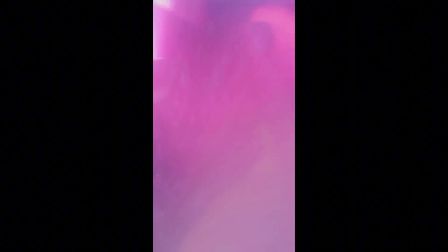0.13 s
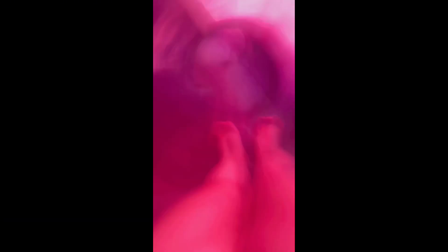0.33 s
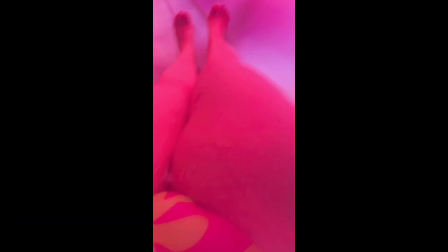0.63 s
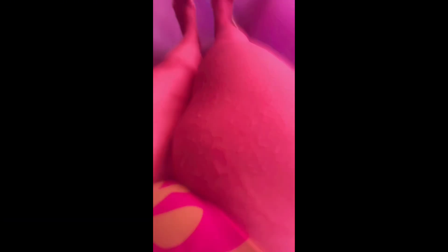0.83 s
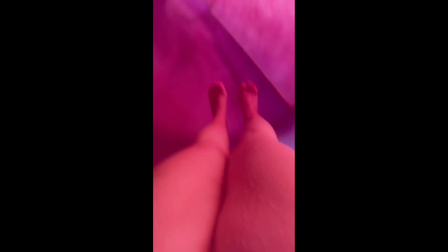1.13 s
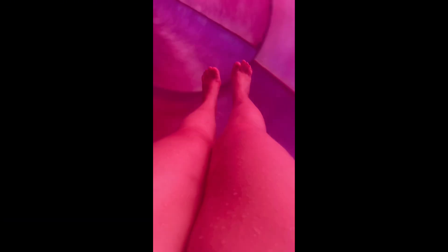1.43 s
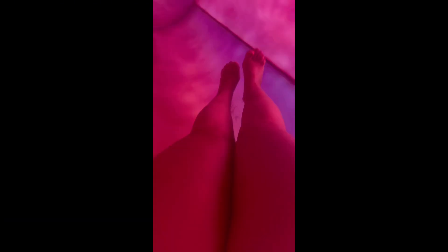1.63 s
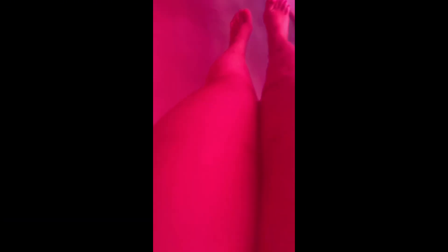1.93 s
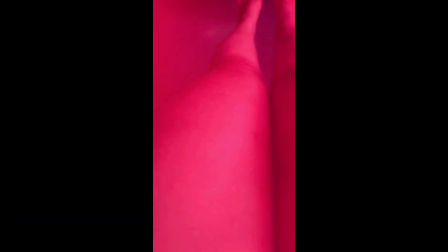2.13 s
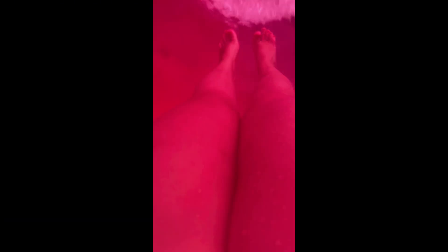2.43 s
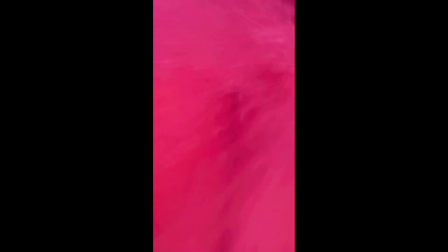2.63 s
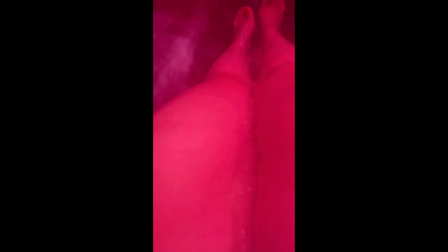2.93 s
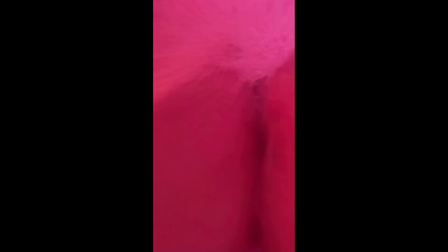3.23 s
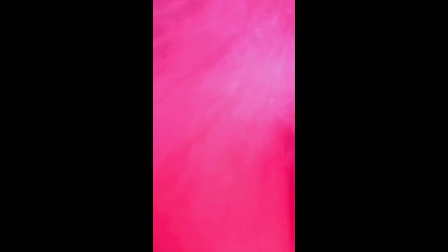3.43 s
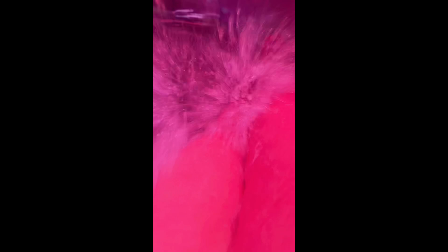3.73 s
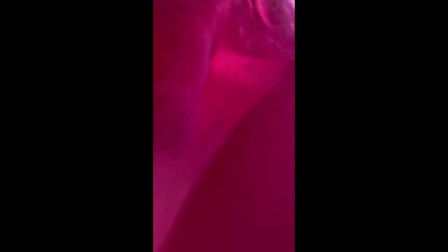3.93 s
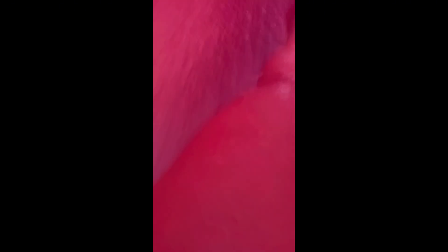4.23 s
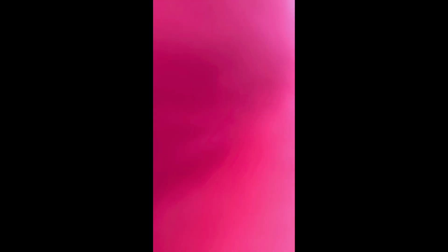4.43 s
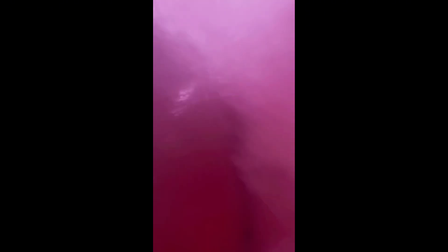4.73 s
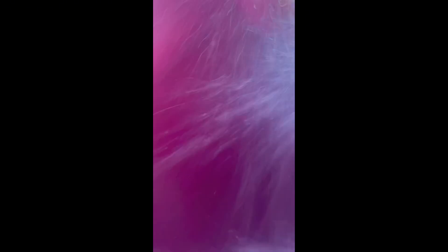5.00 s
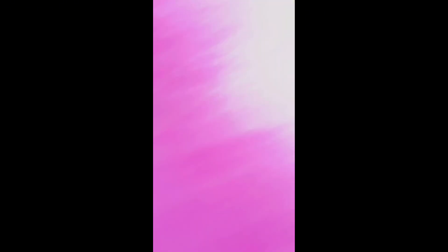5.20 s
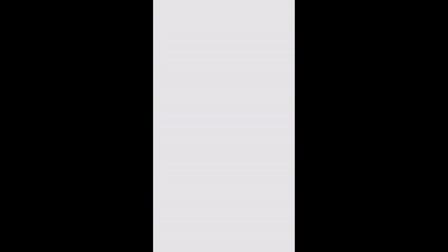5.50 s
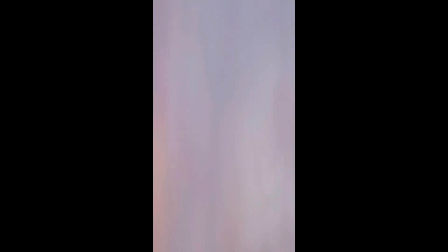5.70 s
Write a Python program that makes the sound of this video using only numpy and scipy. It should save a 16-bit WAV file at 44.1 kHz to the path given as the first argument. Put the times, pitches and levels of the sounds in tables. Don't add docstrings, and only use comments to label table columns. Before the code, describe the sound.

A ride down an enclosed water slide lasting about six seconds, heard from a small housing close to the water. From 0 to 0.3 s there is a light spray with ticking drops and soft knocks. Until 2.5 s thin water rushes steadily, with faint hollow hums swelling in the tube, scattered drop clicks and dull seam knocks near 0.9, 1.2 and 1.9 s. At 2.6 s a hard knock and short splash break in, followed by smaller bumps. From 3.2 to 3.9 s heavy water pounds the housing, with dense thumps falling in pitch, strongest around 3.3 and 3.8 s. After a brief lull, sharp slaps and hissing spray return at 4.4 to 4.8 s. More washes follow at 5.1, 5.2 and 5.4 to 5.5 s, then a dip, and a last bright, heavy splash with a thud hits at 5.8 s.

```python
import sys
import numpy as np
from scipy import signal
from scipy.fft import rfft, irfft, next_fast_len
from scipy.io import wavfile
from scipy.ndimage import uniform_filter1d, map_coordinates

SR = 44100
rng = np.random.default_rng(int(sys.argv[2]) if len(sys.argv) > 2 else 0)


def field_ratio(decibels):
    return 10 ** (np.asarray(decibels, dtype=float) / 20)


def waveform_to_disk(signal):
    frames = np.transpose(np.atleast_2d(signal))
    scaled = np.clip(frames, -1, 1) * 32767
    samples = np.round(scaled).astype(np.int16)
    wavfile.write(sys.argv[1], SR, samples)


N = 258405


def unit(x):
    return x / np.sqrt(np.mean(x ** 2) + 1e-20)


def along(points, hz):
    f, v = np.transpose(points)
    return np.interp(np.log(hz + 1), np.log(f + 1), v)


def curves(rows):
    s, *columns = np.transpose(rows)
    return [np.interp(np.arange(N) / SR, s, column) for column in columns]


def wobble(rate):
    knots = rng.standard_normal(int(N * rate / SR) + 4)
    return map_coordinates(knots, [np.arange(N) * rate / SR])


def filtered(x, response):
    m = next_fast_len(N + SR // 2)
    hz = np.fft.rfftfreq(m, 1 / SR)
    return irfft(rfft(x, m) * response(hz), m)[..., :N]


def coloured(x, spectrum):
    closed = [(1, -120)] + list(spectrum) + [(SR / 2, -120)]
    return unit(filtered(x, lambda hz: field_ratio(along(closed, hz))))


def noise(patchy_db):
    z = signal.stft(rng.standard_normal((2, N)), nperseg=512)[2]
    field = rng.standard_normal(z.shape[1:])
    for axis in (0, 1):
        field = uniform_filter1d(field, size=6, axis=axis)
    return signal.istft(z * field_ratio(patchy_db * unit(field)), nperseg=512)[1][:, :N]


def falling(t, hz, cycles, start, fall):
    turns = hz * t
    phase = start * turns / (1 + turns / fall) + 0.666 * np.sqrt(turns)
    swell = (turns / cycles * np.exp(1 - turns / cycles)) ** 0.93
    return np.sin(2 * np.pi * phase) * swell


# frequency_hz, density_db
RUMBLE = [(20, -37), (45, -3.5), (86, -4), (120, -9), (220, -24)]
# start_s, water_db, wall_rumble_db, mist_db
RUSH = [(0.0, -53, -48, -8.5), (0.2, -39, -37.5, -5), (0.45, -41, -47, -13), (0.85, -39, -48, -2.5),
        (1.1, -39.5, -38, -4.5), (1.5, -40.5, -47.5, -16.5), (1.78, -40.5, -46, -13),
        (2.2, -40.5, -41.5, -16), (2.5, -39, -41, -15), (2.7, -41, -33, -5), (3.15, -36.5, -38.5, -11.5),
        (3.5, -30.5, -41, -6), (4.15, -38.5, -45, -14), (4.3, -38, -40, -19.5), (4.6, -24.5, -27.5, -11),
        (4.95, -38.5, -42.5, -15), (5.45, -27, -23.5, -12), (5.86, -41, -49, -11.5)]
# frequency_hz, density_db
WATER = [(90, -6), (200, -1), (700, 0), (1300, -4.5), (2600, -2), (3700, -5.5), (5800, -11), (10000, -21),
         (12500, -28), (15800, -27)]


def rush():
    water_db, rumble_db, _ = curves(RUSH)
    flutter_db = 0.8 * wobble(10) + 0.5 * wobble(150)
    water = field_ratio(water_db + flutter_db) * coloured(noise(patchy_db=1.0), WATER)
    rumble = field_ratio(rumble_db + 1.5 * wobble(9)) * coloured(noise(patchy_db=2.0), RUMBLE)
    return water + rumble


# frequency_hz, width_hz, level_db
TUBE = [(225.6, 4.7, -7.5), (492.7, 4.9, 6), (744, 19, -22)]
# peak_s, level_db
HUM = [(.355, -45), (.49, -46), (.62, -47), (.855, -41), (.93, -48), (1.075, -42), (1.37, -46), (1.46, -48),
       (1.82, -50), (2.19, -49), (2.5, -49), (2.75, -47), (2.9, -48), (3.13, -43)]


def hum():
    swell_s = 0.045
    t = np.arange(N) / SR
    swells = sum(field_ratio(db) * np.exp(-((t - s) / swell_s) ** 4) for s, db in HUM)
    modes = lambda f: sum(field_ratio(db) * 1j * f * w / (c * c - f * f + 1j * f * w) for c, w, db in TUBE)
    ring = filtered(rng.standard_normal(N), modes)
    steady = ring / np.sqrt(uniform_filter1d(ring ** 2, size=1500) + 0.091 * ring.var())
    return swells * unit(steady) * [[1], [.3]]


# start_s, length_s, spray_db, weight_db
SPITS = [(0.0, 0.28, -34.5, -46.5), (0.197, 0.028, -28.5, -33.5), (0.752, 0.02, -34.5, -71),
         (0.87, 0.047, -39.5, -56), (0.926, 0.044, -41.5, -35), (1.017, 0.029, -34.5, -64),
         (1.168, .04, -34, -46), (1.332, 0.055, -36.5, -63), (1.513, 0.04, -35.5, -50),
         (1.762, 0.058, -42, -43.5), (2.496, 0.038, -35.5, -38.5), (4.892, 0.18, -33, -84),
         (5.516, 0.041, -15.5, -20.5)]
# start_s, length_s, spray_db, weight_db, build_up_db
WAVES = [(2.536, 0.064, -29, -33, 14), (2.598, 0.036, -37, -19, -6), (2.639, .11, -50, -28.5, -1),
         (2.783, 0.11, -52.5, -34.5, -1), (3.182, 0.062, -33.5, -25.5, 17), (3.249, 0.074, -30.5, -9, 9.5),
         (3.329, 0.06, -40, -19.5, -6.5), (3.41, .085, -41, -14, -2.5), (3.514, .09, -30.5, -12.5, 9.5),
         (3.605, 0.054, -33.5, -19.5, -4), (3.75, 0.049, -21, -8.5, 3.5), (3.837, .1, -49, -29.5, -6),
         (3.954, 0.1, -28.5, -31.5, 7), (4.061, 0.042, -36.5, -43, -6), (4.209, 0.2, -31.5, -55, 0.5),
         (4.381, 0.15, -21, -18, -3.5), (4.55, 0.14, -18, -17.5, 0), (4.749, 0.062, -18, -14, 1.5),
         (4.823, 0.048, -29, -28, -3.5), (5.06, 0.08, -25, -26, 0), (5.199, 0.12, -21, -18.5, 1),
         (5.393, 0.16, -23, -19.5, 4.5), (5.579, .19, -35, -35, -11), (5.795, 0.066, -12.5, -14.5, 17)]


def waves(column, rise_s, t60, drip_db):
    drip_t60 = 1
    t = np.arange(0, N / SR, 1e-3)
    power = np.full(len(t), 1e-7)
    for row in [(*spit, 0) for spit in SPITS] + list(WAVES):
        start, length, build_db = row[0], row[1], row[4]
        after = np.maximum(t - start - length, 0)
        rise = np.clip((t - start) / rise_s + .5, 0, 1) ** 2
        build = field_ratio(build_db * np.clip((t - start) / length - 1, -1, 0))
        drain = field_ratio(-60 * after / t60) + field_ratio(drip_db - 60 * after / drip_t60)
        power += (field_ratio(row[column]) * rise * build * drain) ** 2
    return np.interp(np.arange(N) / SR, t, 10 * np.log10(power))


def spray_level():
    return waves(column=2, rise_s=0.009, t60=0.066, drip_db=-18)


def weight_level():
    return waves(column=3, rise_s=0.024, t60=0.082, drip_db=-27)


# frequency_hz, density_db
SPRAY = [(700, -6.5), (1700, 1.5), (2800, 2), (4300, -4), (5300, -2), (7000, -11.5), (12000, -38.5)]
SLOSH = [(250, -5), (550, -1.5), (1000, -4.5), (1600, -14.5), (3000, -18.5)]
MIST = [(2200, -17), (4000, -1.5), (5500, 1.5), (7500, -16.5)]
FIZZ = [(4000, -44), (7000, -5), (10000, 3), (13000, -5), (15900, -0.5)]
# frequency_hz, gain_db
CLICK = [(200, -6), (900, 2), (5000, -2.5), (9000, -20.5), (16000, -39)]
# start_s, click_db, splash_db
SPLATS = [(0.0333, -18, -22), (0.0494, -25.5, 8), (0.1194, -28, 11), (0.2096, -12, -5), (0.744, -19, -4.5),
          (0.8723, -15.5, -17), (1.0187, -15, -10), (1.1843, -26, -2), (1.331, -22.5, -4),
          (1.515, -17, -18), (1.5319, -18, -11), (1.779, -21, -4), (2.5092, -24.5, 2), (2.607, -19, 1.5),
          (2.7434, -27, -25), (2.858, -33, -18), (3.269, -11, -9.5), (3.3253, -14, -1), (3.4177, -13, -6.5),
          (3.458, -3.5, -12.5), (3.5862, -8.5, -6.5), (3.7683, -9, -1.5), (4.0407, -11.5, -6),
          (4.3907, 0, -6.5), (4.5356, -12, 0.5), (4.5605, -12, -8), (4.5973, -5, -3), (4.7407, -2, -10.5),
          (5.3918, -10, -5), (5.797, -22, -9)]


def wash():
    splash_t60, click_t60 = 0.024, 0.005
    spray_db = spray_level()
    fizz_db = curves(RUSH)[2] - 0.16 * (np.clip(spray_db, -50, 0) + 35.5)
    slosh_db = -1 + 0.96 * np.clip(weight_level() - spray_db, -25, 15)
    clumps_db = 0.37 * wobble(30) + 1.67 * wobble(220) + 3.66 * wobble(900)
    crowd = field_ratio(spray_db - 4.0) * unit(field_ratio(clumps_db))

    t = np.arange(SR // 5) / SR
    single, clicks = np.zeros((2, N + SR))
    for s, db, splash_db in SPLATS:
        first = round(s * SR)
        single[first:][:len(t)] += field_ratio(db + splash_db - 9 - 60 * t / splash_t60)
        clicks[first:][:len(t)] += field_ratio(db + 1.5 - 60 * t / click_t60)

    drops = noise(patchy_db=2.5)
    colour = coloured(drops, SPRAY)
    colour += field_ratio(slosh_db) * coloured(drops, SLOSH)
    colour += field_ratio(fizz_db + 5) * coloured(drops, FIZZ)
    colour += field_ratio(fizz_db + 2.5) * coloured(drops, MIST)
    snap = np.sign(drops)
    snaps = filtered(clicks[:N] * snap, lambda hz: field_ratio(along(CLICK, hz)))
    return np.hypot(crowd, single[:N]) * colour + snaps


# frequency_hz, density_db
POUND = [(60, 7.5), (140, -3), (350, 1), (550, 1.5), (1200, -19.5)]


def buffet(count=700):
    pound_db = weight_level()
    heave_db = pound_db - 4.5 + 0.22 * np.clip(pound_db - spray_level(), -10, 15)
    heave_s = 0.051
    swing = uniform_filter1d(field_ratio(heave_db), size=round(heave_s * SR))

    t = np.arange(SR // 20) / SR
    start, pitch, size = rng.random((2, count, 3)).T[..., None]
    grains = field_ratio(-9 * size) * falling(t, 150 + 300 * pitch, cycles=0.86, start=1.22, fall=4.68)
    where = (start * N).astype(int) + np.arange(len(t))
    pound = np.array([np.bincount(where[:, c].ravel(), grains[:, c].ravel(), N + SR)[:N] for c in range(2)])
    pound = coloured(unit(pound) + 1.66 * unit(noise(patchy_db=-1.5)), POUND)
    heave = swing * field_ratio(1.3 * wobble(18)) * coloured(noise(patchy_db=-5.0), RUMBLE)
    return field_ratio(pound_db - 3.5) * pound + heave


# start_s, peak_db, pitch_hz,
# cycles_to_peak
BLOWS = [(0.048, -33, 150, 0.69), (1.194, -22, 260, 0.93), (0.125, -23.5, 125, 1.1),
         (0.205, -15, 140, 0.77), (0.921, -18.5, 218, 1.15), (0.934, -11, 61, 0.6), (0.967, -17, 270, 1.2),
         (1.281, -20.5, 330, 0.92), (1.896, -26, 204, 1.5), (1.972, -29, 234, 1.3),
         (2.605, 1.5, 355, 1.53), (2.619, -12.5, 227, 2.1), (2.693, -13.5, 126, 2.3),
         (2.815, -22.5, 205, 1.9), (2.857, -13.5, 341, 1.38), (2.919, -19, 190, 1.4),
         (2.975, -24, 300, 0.87),
         (3.262, -11.5, 189, 2.5), (3.3, 1, 216, 3.5), (3.345, -4.5, 199, 4), (3.433, -16, 123, 1.7),
         (3.468, -4, 219, 0.81), (3.586, -4.5, 110, 1.6), (3.626, -2.5, 304, 0.75),
         (3.693, -10.5, 246, 0.94), (3.771, -0.5, 346, 3.2), (3.794, 1.5, 306, 1.9), (3.818, 0.5, 297, 1.1),
         (3.859, -12, 110, 0.51), (4.005, -14.5, 206, 1.6), (4.388, -2, 330, 2.8), (4.557, -11, 147, 1.2),
         (4.633, -4, 462, 1.2), (4.692, -4.5, 372, 0.92), (4.761, -17, 328, 1.2), (5.085, -14.5, 114, 1.3),
         (5.395, -11.5, 120, 1.3), (5.696, -16.5, 220, 1.2), (5.456, -11.5, 169, 0.86),
         (5.494, -12, 290, 1.9), (5.828, -8.5, 255, 1.26)]


def thumps():
    out = np.zeros(N + SR)
    t = np.arange(SR // 4) / SR
    for s, db, hz, cycles in BLOWS:
        out[round(s * SR):][:len(t)] += field_ratio(db - 6.0) * falling(t, hz, cycles, start=1.353, fall=7.14)
    ragged_db = 2 * wobble(160)
    return out[:N] * field_ratio(ragged_db) * [[1], [-.4]]


# frequency_hz, coherence (0 to 1)
ALIKE = [(60, .99), (250, .93), (700, .42), (1800, .92), (3000, .6), (5000, .92), (6200, .72), (7500, .97),
         (8900, .62), (10500, .97), (12100, .65), (13500, .97), (14900, .55), (15800, .93)]


def scene():
    mix = rush() + hum() + wash() + buffet() + thumps()
    turn = lambda hz: np.arccos(np.clip(along(ALIKE, hz), -1, 1)) / 2
    both, apart = filtered(mix, lambda hz: np.array([np.cos(turn(hz)), np.sin(turn(hz))]))
    return np.array([both + apart, both - apart])


# frequency_hz, phase_rad
LEAD = [(0, 0), (430, -.5), (1700, 0), (3100, 1.6), (3800, .8), (5080, 0), (6200, 1.5), (6900, 2.8),
        (8300, 3.5), (9500, 5.9), (11800, 6.7), (12400, 9), (14600, 9.8), (15300, 12.3), (17000, 12.7)]


def ports(dry):
    low_hz = 55.3
    f, lead = np.transpose(LEAD)
    port = lambda hz: field_ratio([[-.4], [.4]]) * np.exp(.5j * np.interp(hz, f, lead) * [[1], [-1]])
    wind_cut = lambda hz: -hz ** 2 / (low_hz ** 2 - hz ** 2 + 1.3j * hz * low_hz)
    return filtered(dry, lambda hz: port(hz) * wind_cut(hz))


# frequency_hz, gap_db
GAP = [(1000, 30), (1900, 17), (5000, 15), (7000, 7), (16000, 6)]
# frequency_hz, level_db
FAINT = [(1000, -22), (5000, -13), (9000, -6), (15500, -1)]


def thinned(x, attack_db, quiet_db):
    top_hz = 15400
    hz, _, z = signal.stft([x[0] + x[1], x[0] - x[1]], SR, nperseg=2048)
    line = np.abs(z) ** 2
    band = np.add.reduceat(line, np.arange(0, 1025, 32), axis=1)
    power = np.repeat(band, 32, axis=1)[:, :1025]

    blocks = np.add.reduceat(np.diff(x[0]) ** 2, np.arange(0, N - 1, 128)) + 1e-12
    rise = blocks / uniform_filter1d(blocks, size=9, origin=4)
    first = np.clip(np.arange(z.shape[2]) * 8 - 4, 0, len(rise) - 1)
    calm = np.maximum.reduceat(rise, first) < field_ratio(2 * attack_db)

    weak = (power < power[::-1] * field_ratio(-2 * along(GAP, hz)[:, None])) & calm
    weak |= line < power / 32 * field_ratio(2 * along(FAINT, hz)[:, None])
    weak |= (line < field_ratio(2 * quiet_db)) & (hz[:, None] > 11000)
    kept = z * ~weak * (hz[:, None] < top_hz)
    total, difference = signal.istft(kept, SR, nperseg=2048)[1][:, :N]
    return np.array([total + difference, total - difference]) / 2


def roll_off(x):
    return signal.sosfilt(signal.butter(12, 17120, fs=SR, output="sos"), x)


def record(dry):
    x = ports(dry)
    x = x / (1 + np.abs(x / 0.97) ** 6) ** (1 / 6)
    mix = thinned(x, attack_db=4.5, quiet_db=-85)
    return roll_off(mix)


dry = scene()
out = record(dry)
waveform_to_disk(out)
```